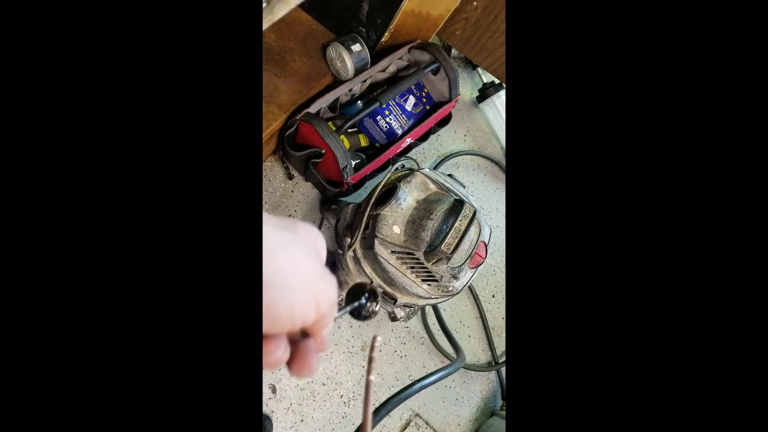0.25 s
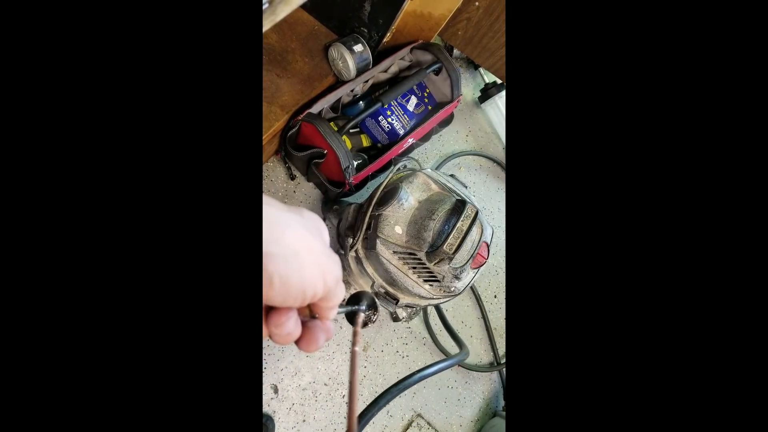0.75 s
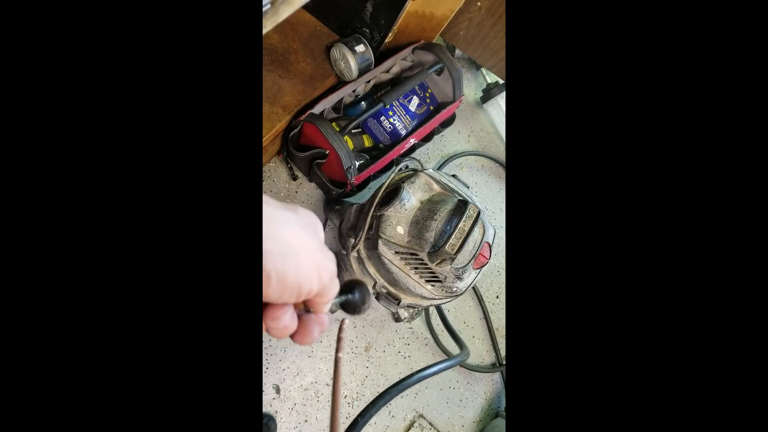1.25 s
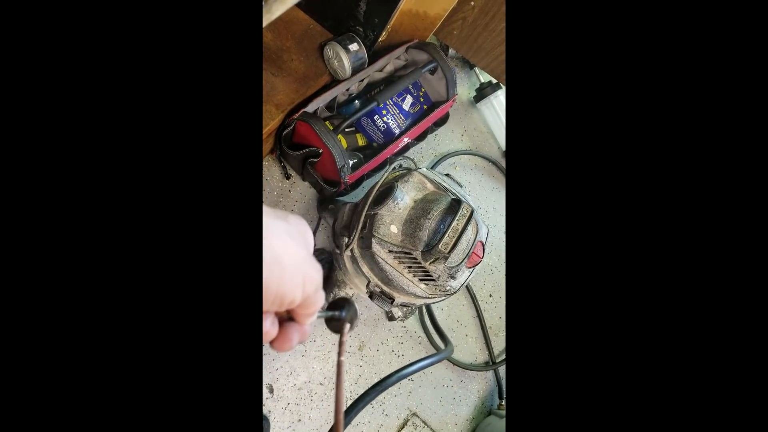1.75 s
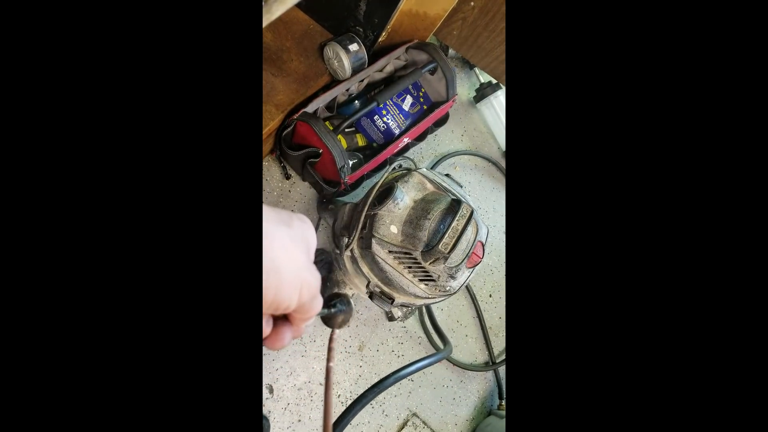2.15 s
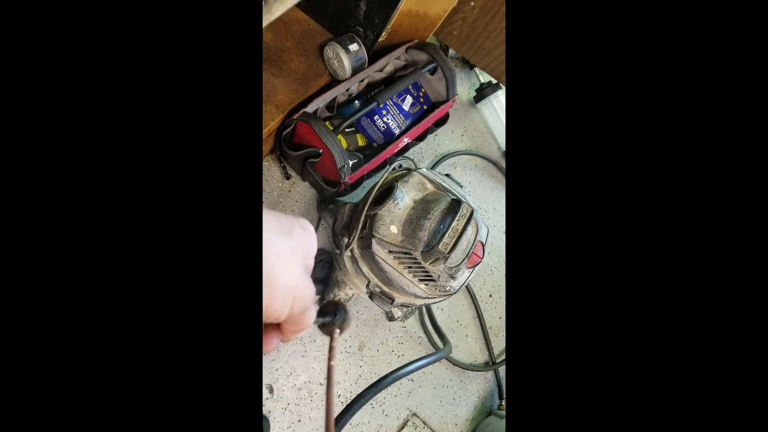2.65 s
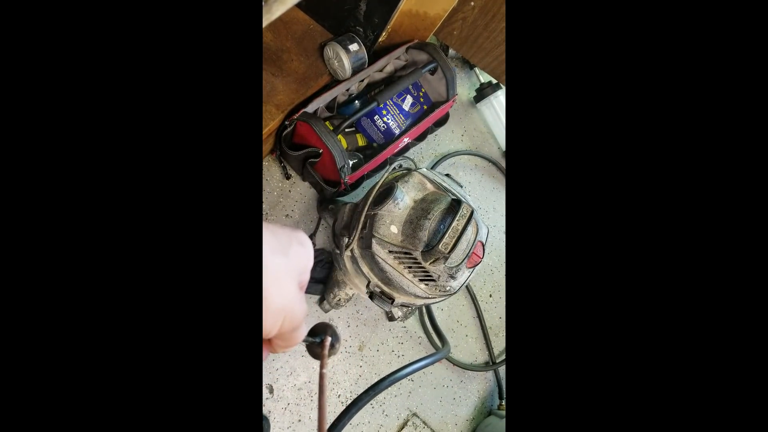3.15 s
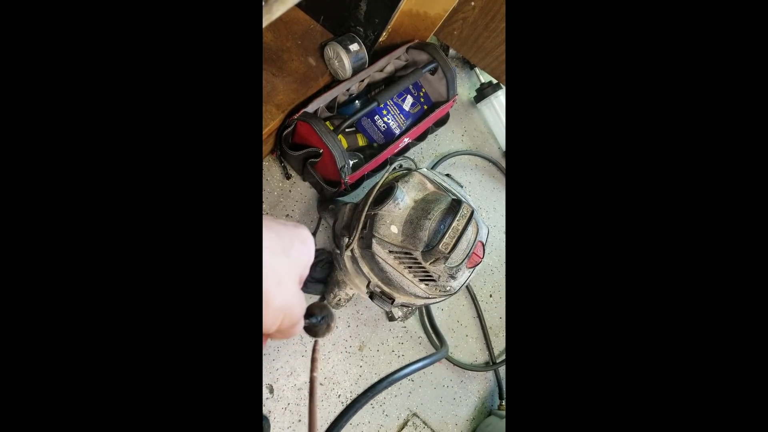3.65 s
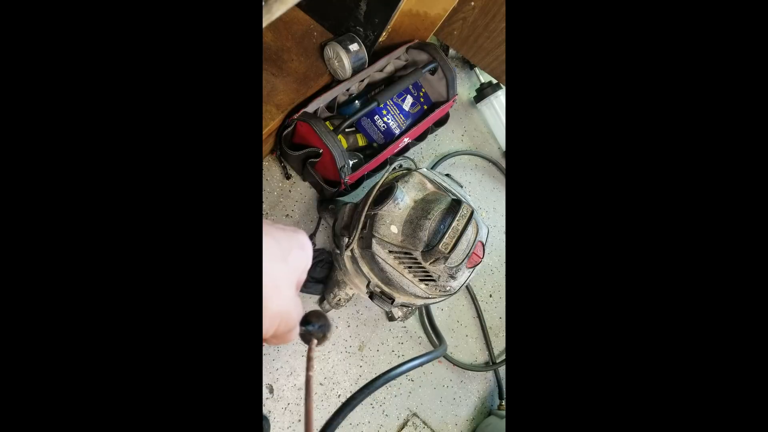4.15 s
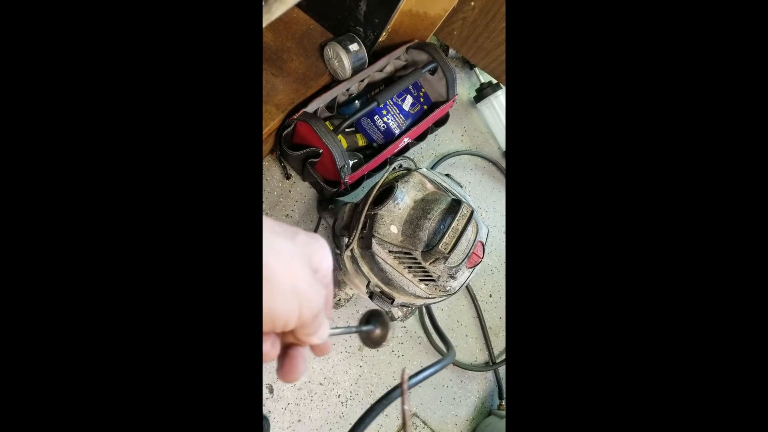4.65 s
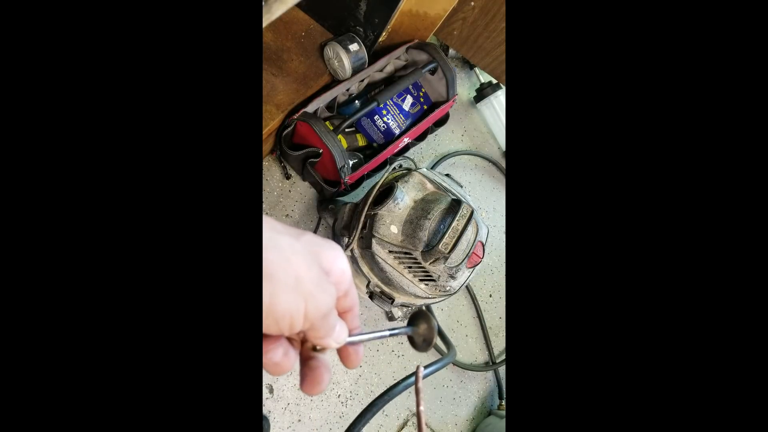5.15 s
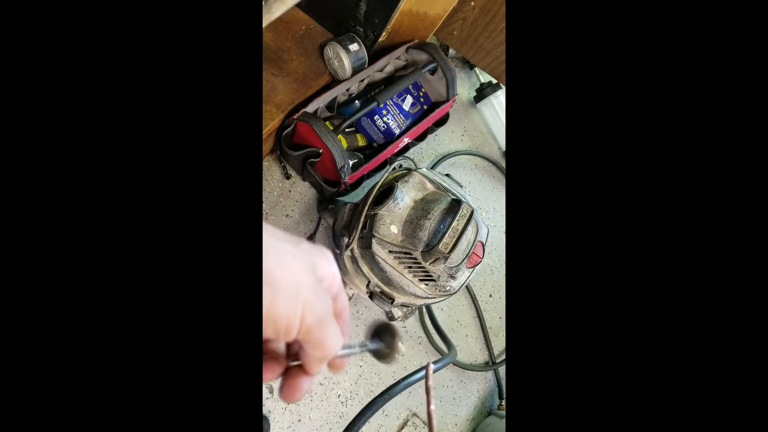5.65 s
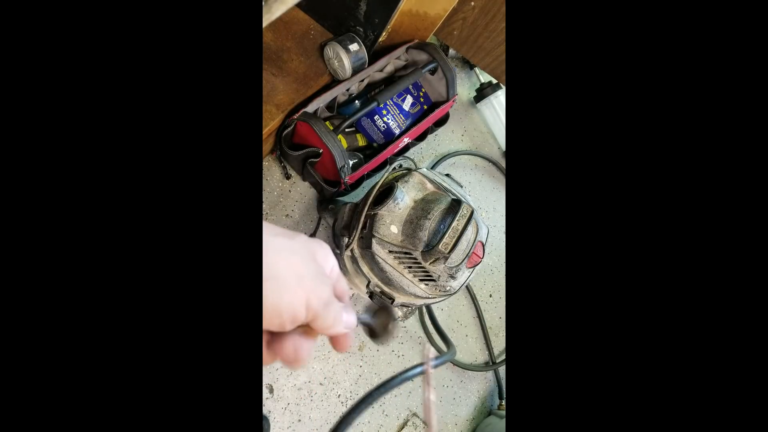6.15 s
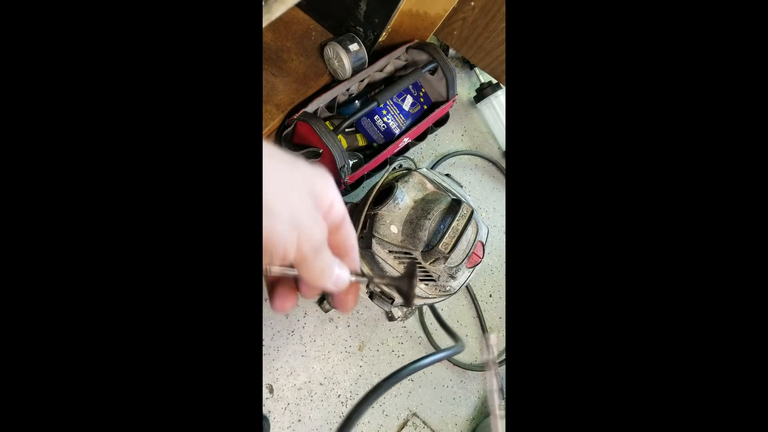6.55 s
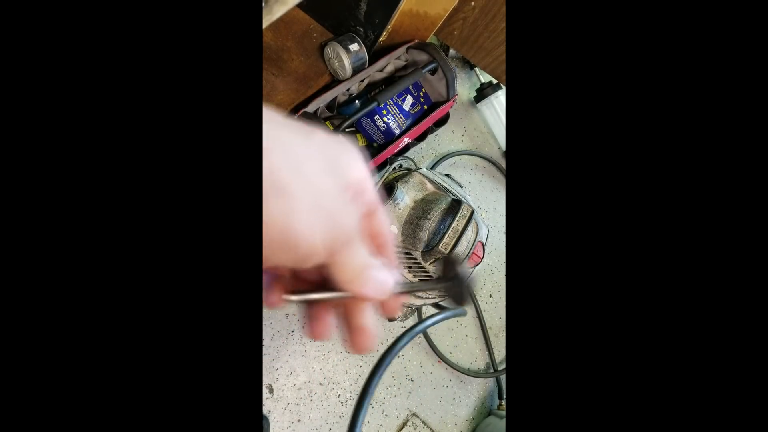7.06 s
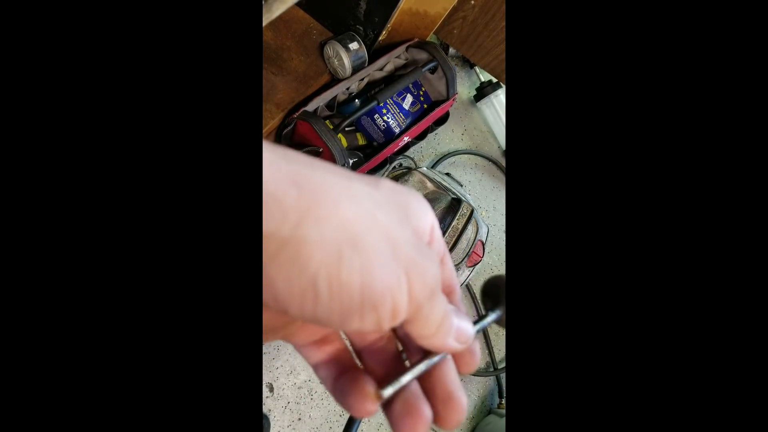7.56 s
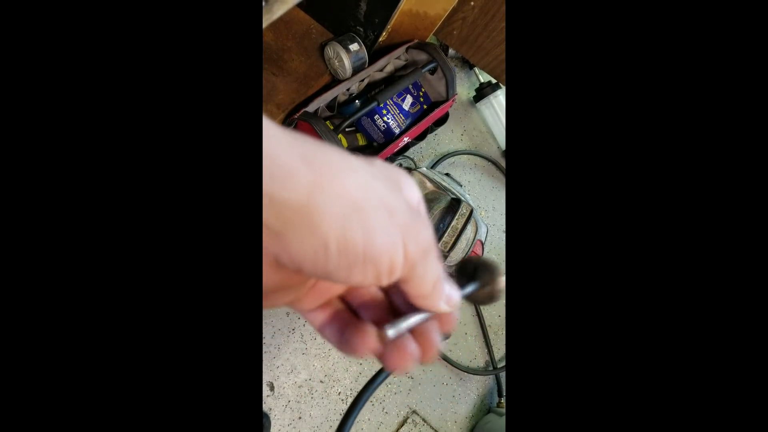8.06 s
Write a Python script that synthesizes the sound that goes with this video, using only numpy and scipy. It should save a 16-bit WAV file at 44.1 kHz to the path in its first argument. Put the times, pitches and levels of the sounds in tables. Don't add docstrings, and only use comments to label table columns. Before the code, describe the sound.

A nearby stereo phone microphone picks up an air gun: one brief burst, a tiny gap with a click, then about three seconds of loud, high, turbulent hiss, slightly fluttering and shifting in brightness. The shut-off rings briefly off garage walls. Afterwards it is very quiet, with settling dust, faint hose air, distant motor hum, skin brushing and bright little steel taps, mostly to the right.

```python
import sys
import numpy as np
from scipy import signal
from scipy.fft import rfft, irfft
from scipy.io import wavfile
from scipy.ndimage import uniform_filter1d

SR = 44100
rng = np.random.default_rng(int(sys.argv[2]) if len(sys.argv) > 2 else 0)


def generate_wav(sig):
    pcm = np.round(np.clip(np.atleast_2d(sig).T, -1, 1) * 32767).astype(np.int16)
    wavfile.write(sys.argv[1], SR, pcm)


def volts(x):
    e = np.asarray(x, float) / 20
    return 10 ** e


N = 365994

SIZE, HOP = 512, 128
FRAME_HZ = np.fft.rfftfreq(SIZE, 1 / SR)[:, None]
FRAME_S = np.arange(N // HOP + 5) * HOP / SR
SIDES = np.array([.5, -.5])[:, None, None]


def evened(x):
    return x / np.sqrt(np.mean(abs(x) ** 2) + 1e-20)


def read(points, hz):
    f, value = np.transpose(points)
    return np.interp(np.log(hz + 1), np.log(f + 1), value)


def columns(rows, t):
    s, *rest = np.transpose(rows)
    return [np.interp(t, s, column) for column in rest]


def coloured(x, points):
    return irfft(rfft(x) * volts(read(points, np.fft.rfftfreq(N, 1 / SR))), N)


def add(mix, s, sound, pan_db):
    part = mix[:, round(s * SR):][:, :len(sound)]
    part += sound[:part.shape[1]] * volts(SIDES[:, 0] * pan_db)


def drift(count, size):
    noise = uniform_filter1d(rng.standard_normal(count), size=size)
    return evened(uniform_filter1d(noise, size=size))


def resonate(x, hz, width):
    turn = np.exp(2j * np.pi * np.cumsum(hz * np.ones(len(x))) / SR)
    r = np.exp(-np.pi * width / SR)
    return 2 * (turn * signal.lfilter([1 - r], [1, -r], x / turn + 1e-18)).real


def rub(length, level_db, hz, width):
    noise = rng.standard_normal(SR // 4)[:round(length * SR)]
    tone = resonate(resonate(noise, hz, width), hz, width)
    return volts(level_db) * evened(tone) * np.hanning(len(noise))


def noise_pair(level_db, same, patchy_db, lag_ms=0):
    a, b, c, d, patches = rng.standard_normal((len(FRAME_S), len(FRAME_HZ), 5)).T
    patches = uniform_filter1d(patches, size=8, axis=0)
    patches = evened(uniform_filter1d(patches, size=14, axis=1))
    same = np.clip(same, 0, 1)
    right = a + 1j * b
    delayed = right * np.exp(-2j * np.pi * FRAME_HZ * lag_ms / 1000)
    left = same * delayed + np.sqrt(1 - same ** 2) * (c + 1j * d)
    z = np.array([left, right]) * volts(level_db + patchy_db * patches)
    return signal.istft(z, nperseg=SIZE, noverlap=SIZE - HOP)[1][:, :N]


# time in seconds,
# street level in dB, air in the hose in dB, grip on the phone in dB.
BACKGROUND = [(0, -48.5, -60.5, -58), (.66, -51, -63, -60), (.76, -65, -65, -69.5), (1.05, -63, -78, -68.5),
              (1.2, -74.5, -78, -79.5), (4.45, -81.5, -70.5, -76.5), (4.75, -79, -67.5, -72),
              (5.22, -81, -71.5, -71.5), (5.4, -71.5, -64.5, -62.5), (5.65, -68.5, -62, -64),
              (6.1, -76, -63.5, -66.5), (6.33, -66, -62, -64.5), (6.45, -68.5, -64, -63),
              (6.7, -63.5, -62, -59), (7.1, -69, -65, -59.5), (7.5, -76, -70, -65), (7.95, -71.5, -71, -65),
              (8.2, -70.5, -69.5, -59)]
# frequency in Hz, level in dB per Hz.
RUMBLE_COLOUR = [(12, -34), (20, 3), (134, 1), (166, -6), (190, -8), (437, -12), (500, -17), (750, -40),
                 (1100, -120)]
TRAFFIC_COLOUR = [(140, -34.5), (230, -2), (402, -10), (431, -4.5), (548, -3), (747, 0), (2500, -18.5),
                  (3250, -51), (5500, -120)]
HISS_COLOUR = [(710, -29), (1200, -1), (1360, -8), (1540, -6), (1840, -3), (2290, -4), (2600, -1),
               (3900, 1), (5370, -2), (6950, -3), (7730, -6.5), (9150, -24.5), (10000, -23.5),
               (13000, -52.5), (22000, -120)]
RUSTLE_COLOUR = [(1760, -31.5), (3000, -10.5), (6210, -4), (7350, 0), (9210, -17), (11600, -5), (15100, -7),
                 (16200, -11)]


def background():
    traffic_db, hiss_db, rumble_db = columns(BACKGROUND, FRAME_S)
    rustle_db = -77.5 + .3 * (hiss_db + 67)
    rumble = noise_pair(0 * FRAME_HZ + rumble_db - 2.5 * SIDES, .92, 1.0)
    power = volts(read(TRAFFIC_COLOUR, FRAME_HZ) + traffic_db - 7.5 - 3.0 * SIDES) ** 2
    power += volts(read(HISS_COLOUR, FRAME_HZ) + hiss_db - 15.0 - 2.5 * SIDES) ** 2
    power += volts(read(RUSTLE_COLOUR, FRAME_HZ) + rustle_db - 8.5 - 2.5 * SIDES) ** 2
    same = 0.57 / (1 + (FRAME_HZ / 600) ** 2)
    return coloured(rumble, RUMBLE_COLOUR) + noise_pair(10 * np.log10(power), same, 1.3)


# start in seconds, length in seconds, level in dB.
MOTOR = [
    (.03, 0.11, -54.5),
    (.14, .7, -53),
    (.97, 0.11, -60.5),
    (6.52, 0.28, -58.5),
    (6.8, 0.56, -55.5),
]


def motor():
    out = np.zeros((2, N))
    for s, length, level_db in MOTOR:
        t = np.arange(0, length, 1 / SR)
        waver = drift(count=SR, size=1000)[:len(t)]
        throb_db = 1.5 * drift(count=SR, size=1000)[:len(t)]
        hz = 197.4 * (1 + .018 * waver)
        tone = 1.2 * np.sin(2 * np.pi * np.cumsum(hz) / SR)
        for ratio, share in (1, .5), (3 / 2, volts(-13.5)):
            noise = rng.standard_normal(SR)[:len(t)]
            fuzz = resonate(resonate(noise, ratio * hz, 45), ratio * hz, 45)
            tone += share * evened(fuzz)
        fade = np.clip(np.minimum(t, length - t) / .03, 0, 1)
        add(out, s, volts(level_db + throb_db) * tone * fade, -3.)
    return out


# start in seconds, length in seconds, level in dB, pitch in Hz.
BUMPS = [
    (.03, 0.066, -45.5, 130),
    (6.29, .074, -68, 690),
    (6.605, 0.053, -57.5, 740),
    (6.605, 0.048, -68, 1060),
    (6.77, 0.059, -62, 774),
]


def bumps():
    out = np.zeros((2, N))
    for s, length, level_db, hz in BUMPS:
        add(out, s, rub(length, level_db, hz, .3 * hz), 0.5)
    return out


# opening in seconds, rise in seconds, shutting in seconds, fall in seconds.
TRIGGER = [
    (0.683, 0.013, 0.85, 0.025),
    (1.069, 0.012, 4.1725, 0.052),
]
# time in seconds, jet level in dB, roar in dB as it strikes the
# valve face, sizzle in dB as it turns to the microphone, shade of the hand in dB.
SHORT_PUFF = [
    (.71, -18, -5, -5.5, 1),
    (.77, -18.5, -2.5, -6, 1.5),
    (.8, -23, -5.5, 1.5, 1.5),
    (.85, -18, -8.5, -0.5, 2),
]
SWEEPS = [
    [(1.1, -21, -5, -1, 1), (1.36, -24, -6.5, -3.5, 0.96), (1.52, -25, -4.5, -2, -0.27),
     (1.62, -24, -6, -3, -0.48), (1.86, -24.5, -8.5, 0, -2), (2.1, -23.5, -8.5, -2.5, -2),
     (2.2, -24.5, -8, 1.5, -2), (2.4, -26.5, -6.5, 0, -2), (2.58, -25, -7, -0.5, -2)],
    [(2.74, -26, -13, -3, 0), (2.92, -26, -11.5, 1, 0.0055), (3.26, -25.5, -13, 1, 0),
     (3.42, -22.5, -9, 3, 0), (3.58, -24.5, -9, 0.5, 0.0036), (3.74, -23.5, -7.5, -0.5, 0),
     (3.86, -24.5, -8.5, 4.5, 0.0019), (4.02, -26, -6.5, 1, 0), (4.16, -23, -8.5, 1, 0)],
]
# time in seconds, lag of the left port in ms, stretch of the near echoes.
LAG = [(.7, 0.06, 0.93), (1.2, 0.052, 0.95), (2.5, 0.068, 0.94), (2.9, 0.091, .98), (4.2, 0.07, 0.92)]
# frequency in Hz, coherence as a share.
JET_SAME = [(200, 0.59), (1000, 0.28), (2300, 0.63), (3600, 0.62), (4600, .92), (5400, 0.67), (6100, 0.77),
            (7500, 0.6), (9500, 0.15), (11500, 0.71), (16000, .65)]
# frequency in Hz, level in dB.
JET_LEFT = [(150, -29.5), (500, -26.5), (1200, -20), (1900, -15.5), (2300, -13), (3500, -9.5), (4500, -0.5),
            (6000, 0.5), (7500, 1.5), (8200, -8), (8900, -15), (10300, -9.5), (11800, -4.5), (15700, -6.5)]
JET_RIGHT = [(150, -22.5), (500, -20), (1200, -21.5), (1900, -17), (2300, -12.5), (3500, -9), (4500, 0),
             (6000, -0.5), (7500, 3), (8200, -1), (8900, -12), (10300, -11.5), (11800, -5.5), (15700, -9.5)]
# left delay in ms, left share, right delay in ms, right share.
NEAR_ECHOES = [(0.75, 0.036, 0.74, 0.15), (0.95, 0.091, 1.33, 0.17), (2.84, .07, 2.5, .07),
               (4.73, 0.066, 4.62, .07), (1.85, 0.11, 1.9, 0.071)]


def jet():
    level_db, roar_db, sizzle_db, shade_db = columns(SHORT_PUFF + SWEEPS[0] + SWEEPS[1], FRAME_S)
    lag_ms, stretch = columns(LAG, FRAME_S)
    colour_db = np.array([read(JET_LEFT, FRAME_HZ), read(JET_RIGHT, FRAME_HZ)])
    comb = np.ones((2, len(FRAME_HZ), len(FRAME_S)), complex)
    for left_ms, left_share, right_ms, right_share in NEAR_ECHOES:
        for port, ms, share in (0, left_ms, left_share), (1, right_ms, right_share):
            comb[port] += share * np.exp(-2j * np.pi * FRAME_HZ * ms * stretch / 1000)

    deep = 1 / (1 + (FRAME_HZ / 1620) ** 8)
    low = 1 / (1 + (FRAME_HZ / 3800) ** 8)
    high = 1 / (1 + (8300 / (FRAME_HZ + 1)) ** 12)
    shade = np.exp(-((FRAME_HZ - 9460) / 1500) ** 2)
    moving_db = level_db + deep * (2 + .15 * (roar_db + 9.0))
    moving_db += (low - deep) * (roar_db + 12.5)
    moving_db += high * (sizzle_db + 3.5) + shade * shade_db
    pan_db = SIDES * (-.5 - .42 * (FRAME_S - 1))
    total_db = colour_db + 20 * np.log10(abs(comb)) + moving_db + pan_db - 13
    hiss = noise_pair(total_db, read(JET_SAME, FRAME_HZ), 0.88, lag_ms)
    hiss = coloured(hiss, [(30, -25.5), (120, 1.5)])

    t = np.arange(N) / SR
    valve = np.zeros(N)
    for opens, rise, shuts, fall in TRIGGER:
        valve += np.clip((t - opens) / rise, 0, 1) ** 3 * np.clip(1 - (t - shuts) / fall, 0, 1) ** 2
    return hiss * valve * volts(0.62 * drift(count=N, size=90))


# time in seconds, peak in dB, left-right difference in dB.
PUFFS = [(0.702, -39.5, -14), (0.829, -38, -8.5), (0.867, -42, -6), (1.083, -39.5, -9), (1.258, -48, -0.5),
         (1.549, -49, -4.5), (2.449, -52, -8.5), (2.584, -49, -24), (3.349, -51, -7.5)]


def puffs():
    out = np.zeros((2, N))
    u = np.arange(4000) / SR / .003
    for s, peak_db, pan_db in PUFFS:
        add(out, s, volts(peak_db + 7.5) * u * (2 - u) * np.exp(-u), pan_db)
    return out


# frequency in Hz, time to fall 60 dB in seconds.
GARAGE_T60 = [(300, 0.37), (2000, 0.46), (5000, 0.43), (9000, 0.33), (15000, 0.21)]


def garage(x):
    taps = np.zeros((2, SR))
    at = np.arange(200, SR - 20, 20) + rng.integers(0, 20, (2, (SR - 201) // 20))
    np.put_along_axis(taps, at, rng.choice([-1., 1.], at.shape), 1)
    hz, t, z = signal.stft(taps, SR, nperseg=256)
    decay = volts(-60 * t / read(GARAGE_T60, hz)[:, None])
    tail = signal.istft(z * decay, SR, nperseg=256)[1]
    return signal.fftconvolve(x, tail / np.linalg.norm(tail[0]), axes=1)[:, :N]


# time in seconds, peak in dB, ring in Hz, left-right in dB.
TICKS = [(0.9834, -21, 7720, -14), (4.3974, -39, 6900, 4), (4.4151, -40, 4510, -1.5),
         (4.5517, -47, 3880, -2), (4.7294, -49, 12500, 0), (5.3073, -43, 12550, -4),
         (6.015, -46, 13000, -12), (6.313, -35, 3690, -17), (6.4884, -32, 6820, -17),
         (6.9706, -35.5, 4200, -14), (7.0074, -50, 3870, -2.5), (7.0419, -44.5, 3900, -9),
         (7.0636, -34, 13700, -16), (7.0933, -39, 4800, -13.5), (7.1096, -28.5, 3880, -13),
         (7.113, -26, 13600, -18), (7.1169, -35, 4170, -9), (7.127, -34.5, 3800, -5.0),
         (7.1452, -44, 14300, -9), (7.161, -37.5, 4316, -8), (7.1676, -30, 14040, -9.0),
         (7.8764, -43, 4110, -13.5), (7.8825, -33, 13470, -21), (7.888, -35.5, 4030, -12)]
TAPS = [(4.8294, -50, 5850, 0.5), (6.2657, -46, 6850, -7), (7.8331, -46, 6630, -10),
        (7.8345, -50, 3900, -10), (8.0904, -39, 6240, -17), (8.091, -43, 3600, -14),
        (4.7294, -50, 3500, -1.5)]
# frequency in Hz, level in dB.
TICK_COLOUR = [(1000, -31.5), (2200, -11.5), (3300, -13.5), (4000, 0), (5500, -10), (7300, -3.5),
               (9000, -8), (13000, -2), (16000, -3)]


def ticks():
    out = np.zeros((2, N))
    t = np.arange(600) / SR
    for rows, ring in (TICKS, .38), (TAPS, .84):
        for s, peak_db, hz, pan_db in rows:
            crack = rng.standard_normal(len(t)) * np.exp(-t / .0014)
            tick = (1 - ring) * evened(crack) + ring * evened(resonate(crack, hz, 700))
            add(out, s + 0.00077, volts(peak_db + 1.5) * tick / abs(tick).max(), pan_db)
    return coloured(out, TICK_COLOUR)


def grit():
    out = np.zeros((2, N))
    t = np.arange(300) / SR
    for when, size, side in rng.random((500, 3)):
        grain = rng.standard_normal(len(t)) * np.exp(-t / .0022)
        level_db = -67.5 - 5 * when ** 3 + 5 * size ** 3
        add(out, 4.3 + .6 * when ** 1.5, volts(level_db) * grain, 3 + 8 * (side - .5))
    return coloured(out, [(4000, -32.0), (7500, 0), (9500, -4.0), (13000, 1)])


# start in seconds, length in seconds, level in dB,
# centre in Hz, left-right difference in dB.
BRUSHES = [(5.288, 0.067, -69, 12500, 0), (5.957, 0.11, -70, 13500, -18), (6.085, 0.1, -68, 13000, -16),
           (6.6, 0.066, -65, 5500, 10), (6.688, 0.09, -63, 12700, -17), (6.7, .06, -64, 4500, -5),
           (6.78, 0.088, -67, 12000, -12), (6.76, 0.081, -60, 4000, -6), (6.988, 0.07, -71, 12000, -8),
           (8.238, 0.075, -68.5, 6200, -12)]


def brushes():
    out = np.zeros((2, N))
    for s, length, level_db, hz, pan_db in BRUSHES:
        add(out, s, rub(length, level_db, hz, 4900), pan_db)
    return out


# frequency in Hz, width in Hz, level in dB.
SCRAPE = [(2260, 460, -56.5), (4160, 910, -55), (7450, 1500, -52), (13000, 4000, -47.5)]


def scrape():
    out = np.zeros((2, N))
    for hz, width, level_db in SCRAPE:
        add(out, 7.154, rub(.022, level_db, hz, width), -16)
    return out


# frequency in Hz, level in dB.
GARAGE_COLOUR = [(800, -0.5), (2500, -1), (4700, -3.5), (7500, -1), (13000, 3)]


def scene():
    air = jet()
    hands = bumps() + ticks() + grit() + brushes() + scrape()
    to_walls = volts(-9.5) * coloured(air, GARAGE_COLOUR) + volts(-27) * hands
    return background() + motor() + air + hands + puffs() + garage(to_walls)


def top_cut(x):
    return signal.sosfilt(signal.butter(12, 16820, fs=SR, output="sos"), x)


def record(dry):
    limited = dry / (1 + abs(dry / .95) ** 6) ** (1 / 6)
    hz = np.fft.rfftfreq(N, 1 / SR)
    top = np.clip((15790 - hz) / 90, volts(-50.5), 1)
    bass = hz / np.hypot(hz, 25)
    return top_cut(irfft(rfft(limited) * top * bass, N))


dry = scene()
out = record(dry)
generate_wav(out)
```